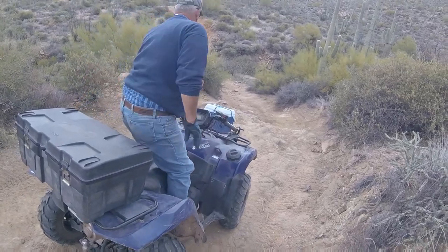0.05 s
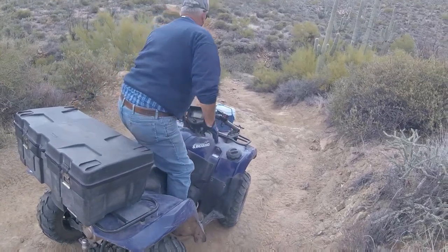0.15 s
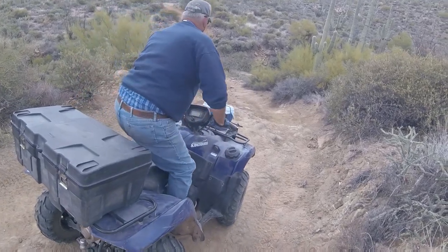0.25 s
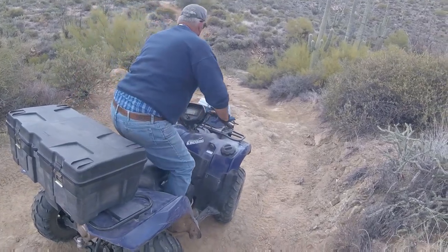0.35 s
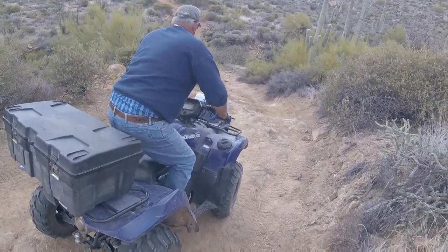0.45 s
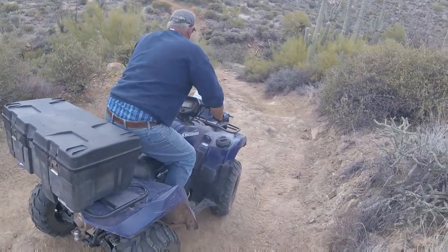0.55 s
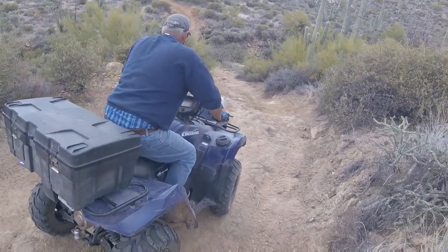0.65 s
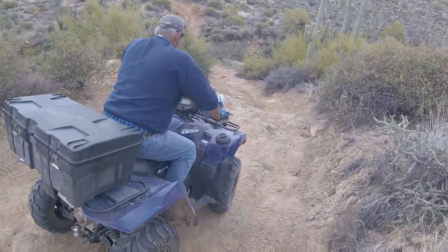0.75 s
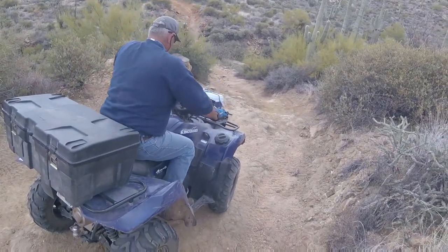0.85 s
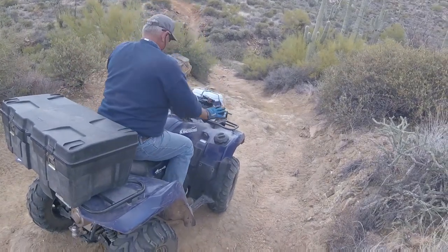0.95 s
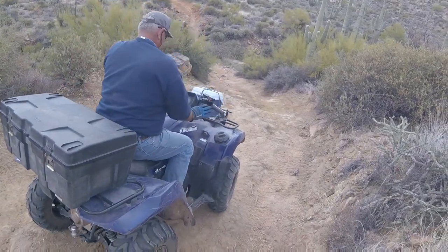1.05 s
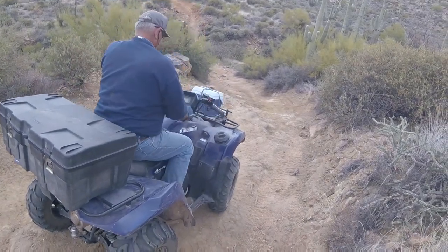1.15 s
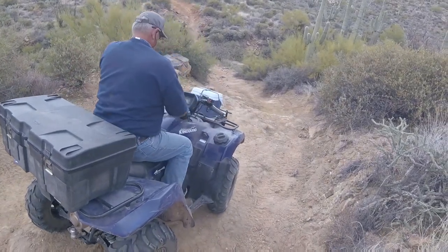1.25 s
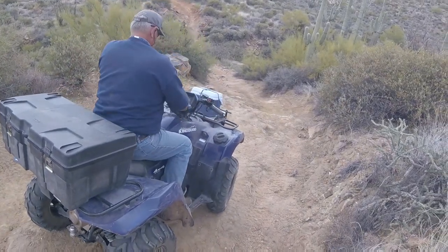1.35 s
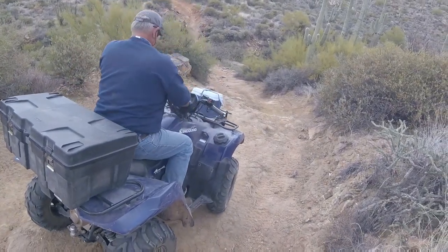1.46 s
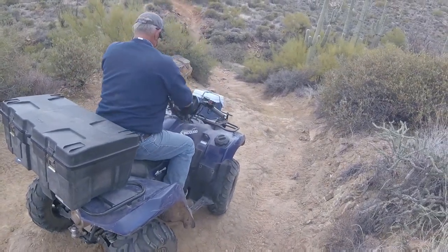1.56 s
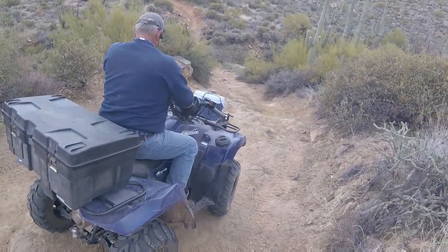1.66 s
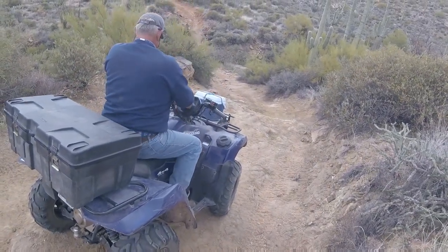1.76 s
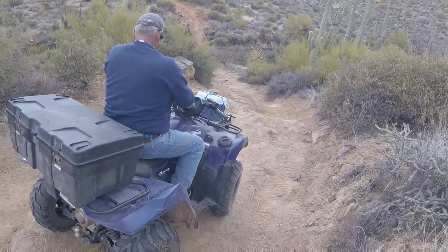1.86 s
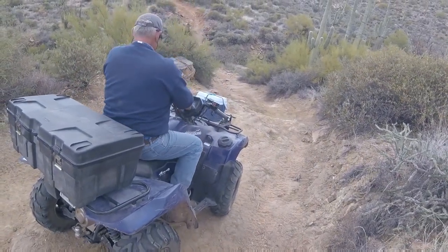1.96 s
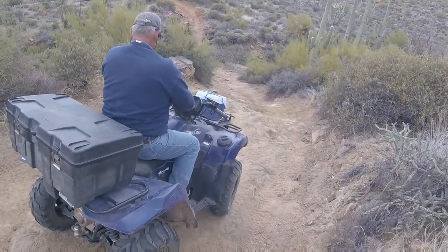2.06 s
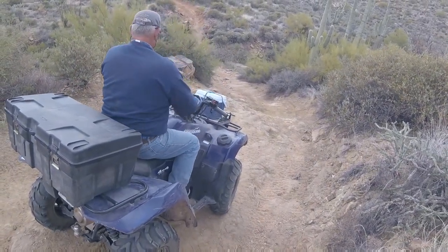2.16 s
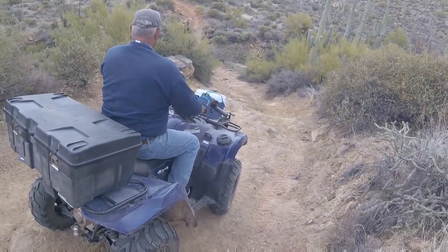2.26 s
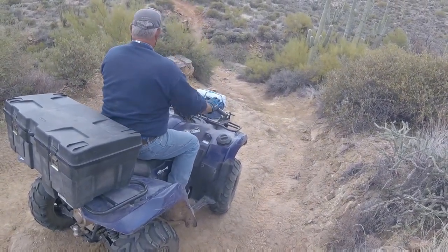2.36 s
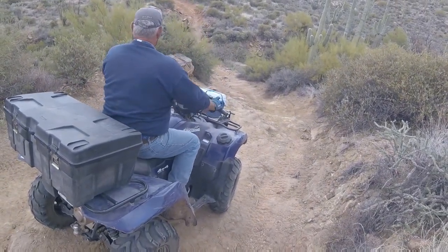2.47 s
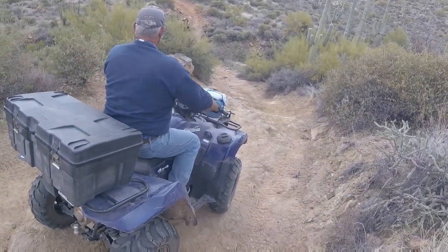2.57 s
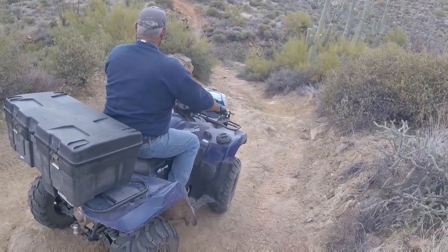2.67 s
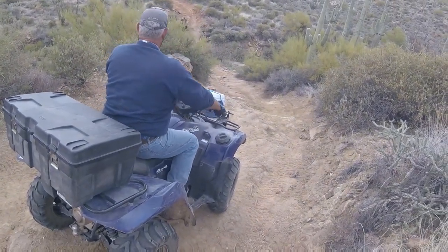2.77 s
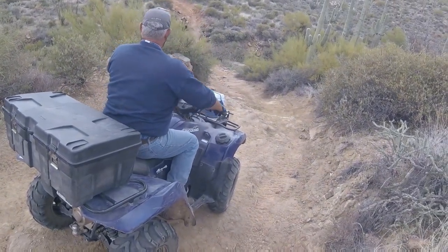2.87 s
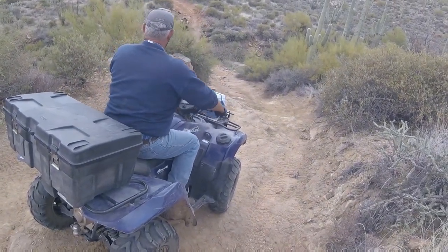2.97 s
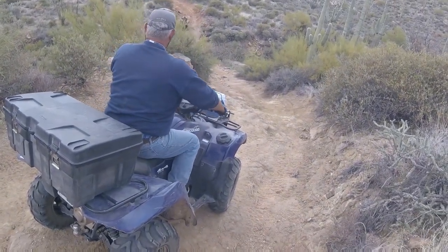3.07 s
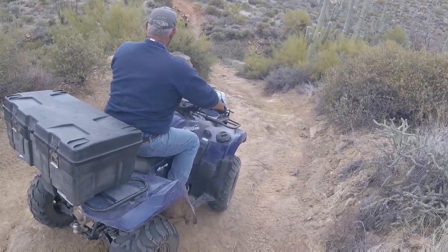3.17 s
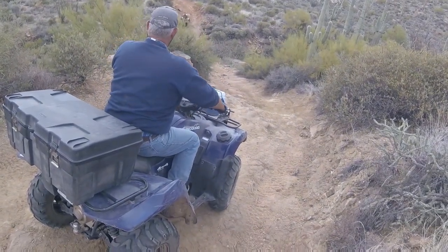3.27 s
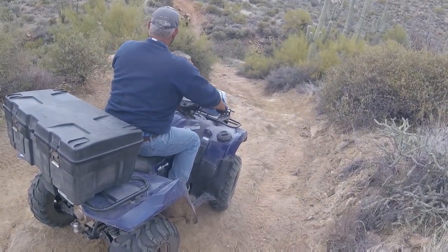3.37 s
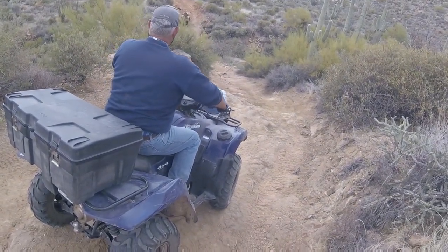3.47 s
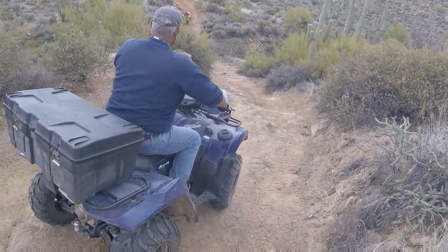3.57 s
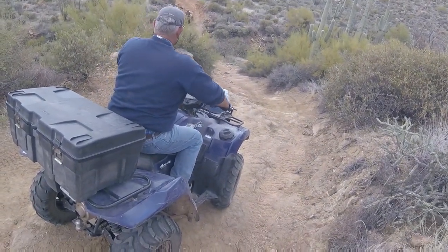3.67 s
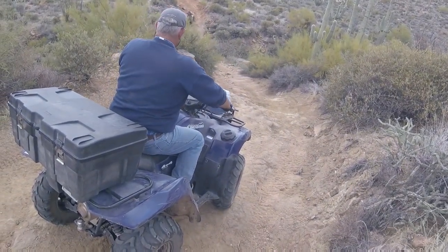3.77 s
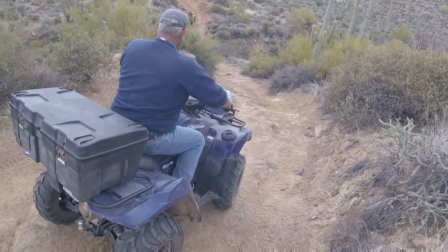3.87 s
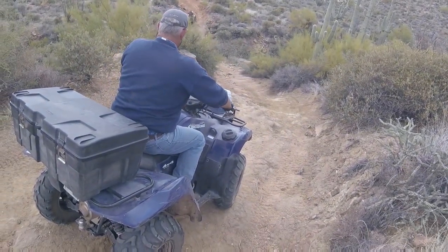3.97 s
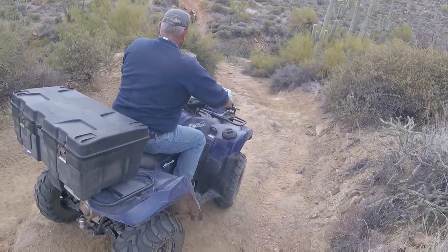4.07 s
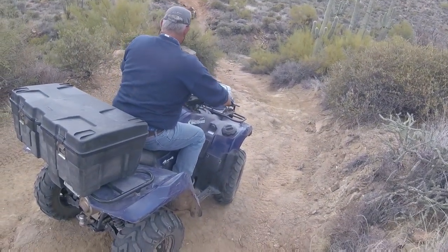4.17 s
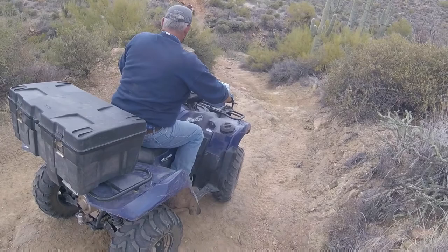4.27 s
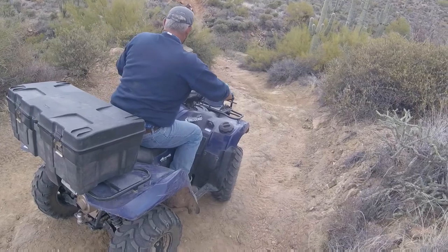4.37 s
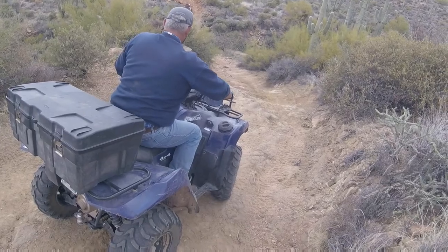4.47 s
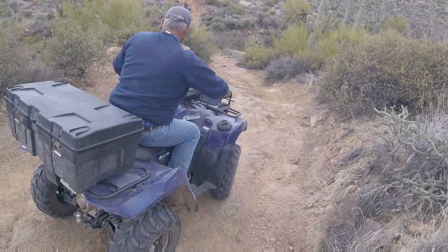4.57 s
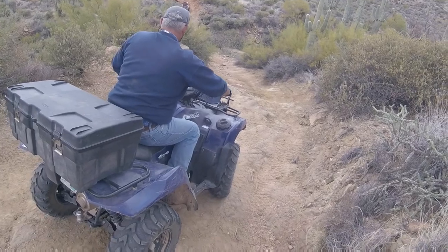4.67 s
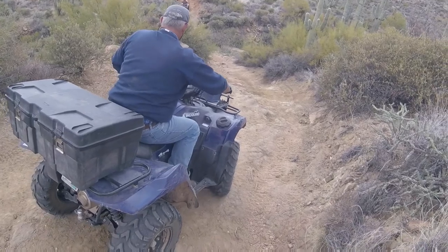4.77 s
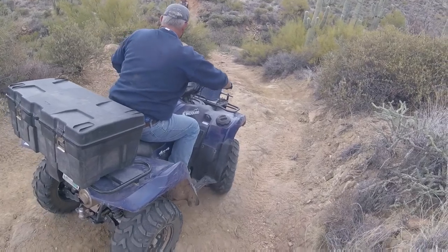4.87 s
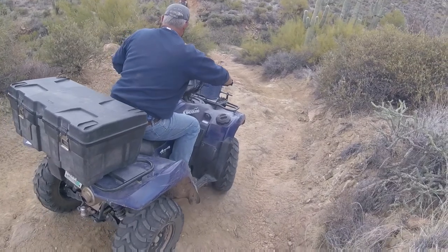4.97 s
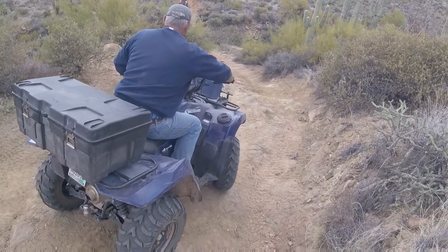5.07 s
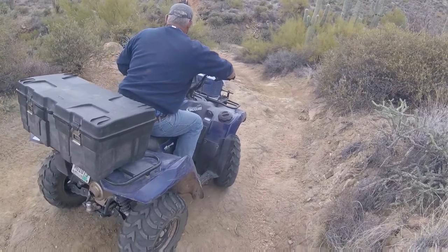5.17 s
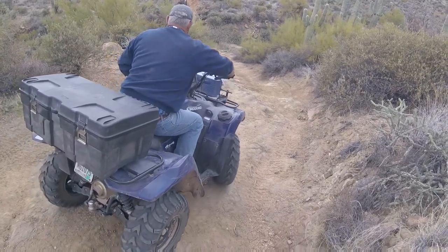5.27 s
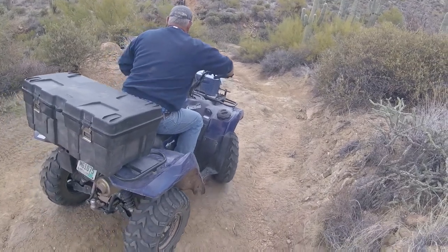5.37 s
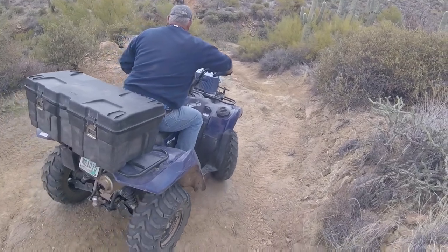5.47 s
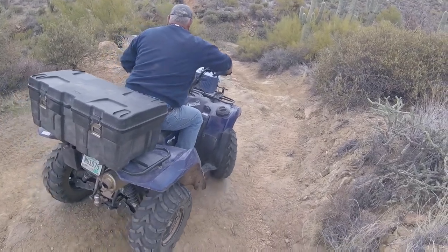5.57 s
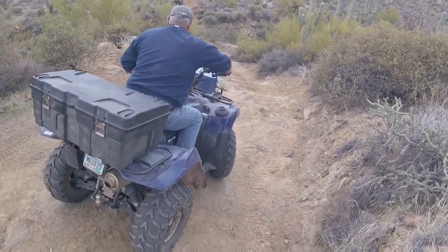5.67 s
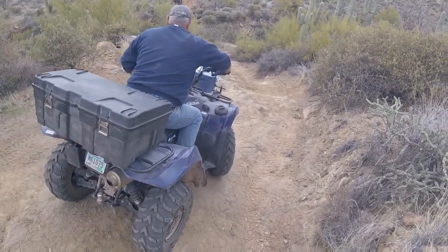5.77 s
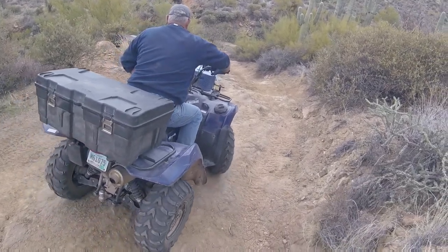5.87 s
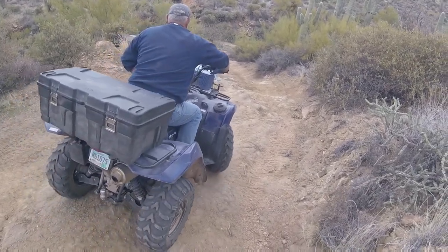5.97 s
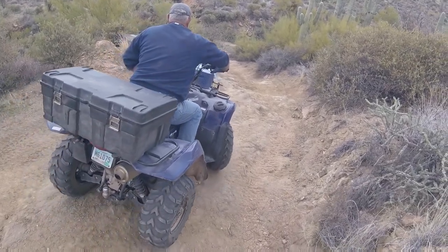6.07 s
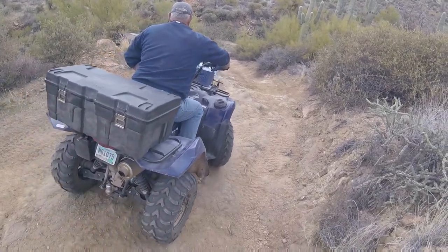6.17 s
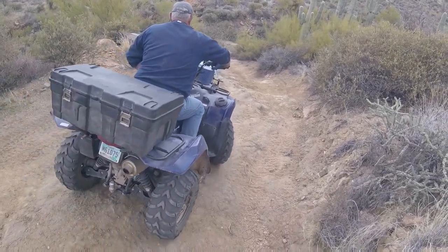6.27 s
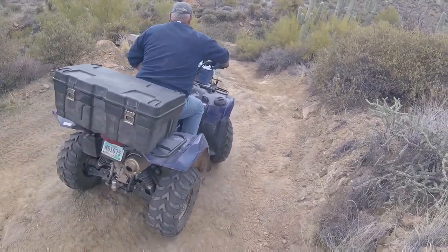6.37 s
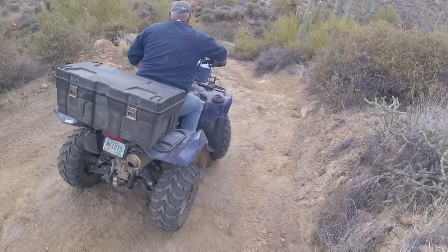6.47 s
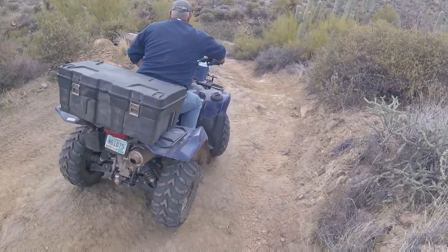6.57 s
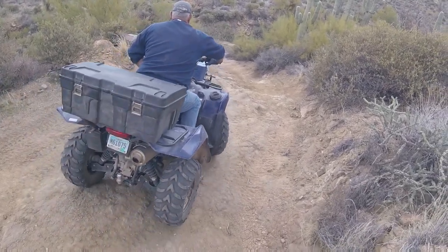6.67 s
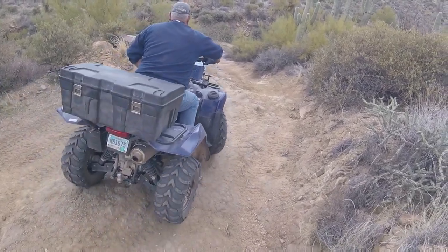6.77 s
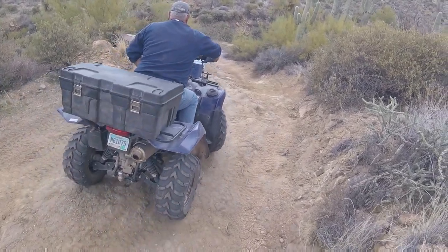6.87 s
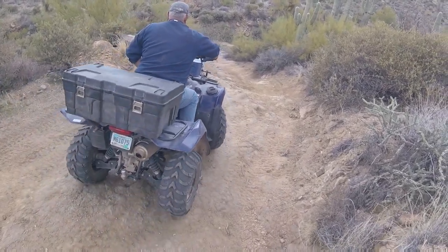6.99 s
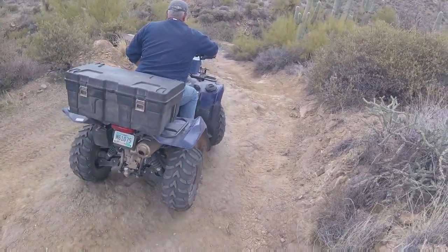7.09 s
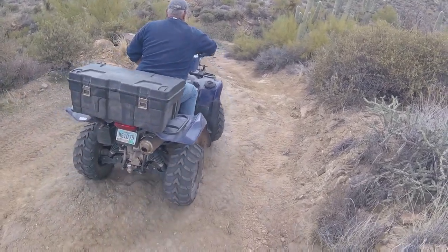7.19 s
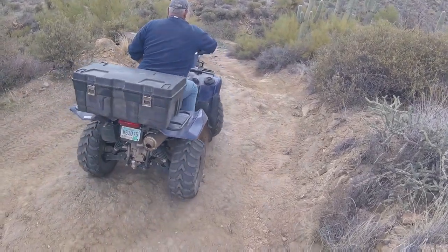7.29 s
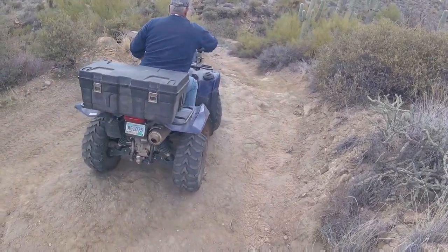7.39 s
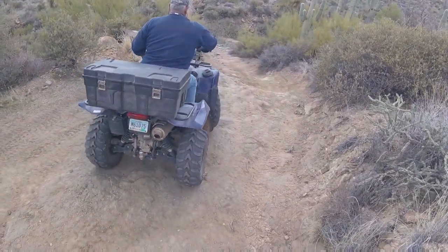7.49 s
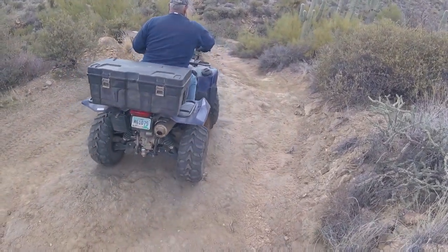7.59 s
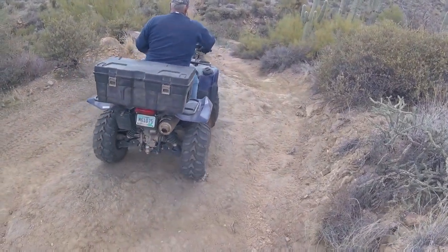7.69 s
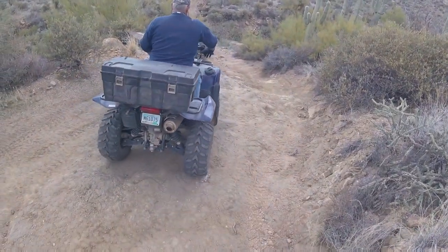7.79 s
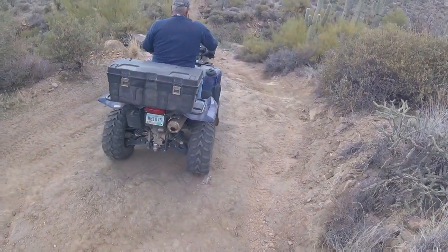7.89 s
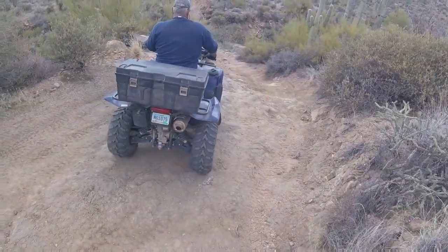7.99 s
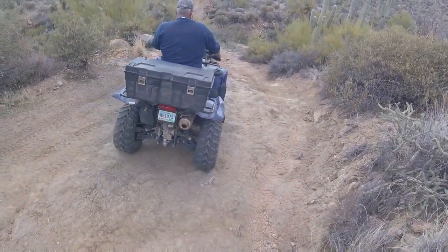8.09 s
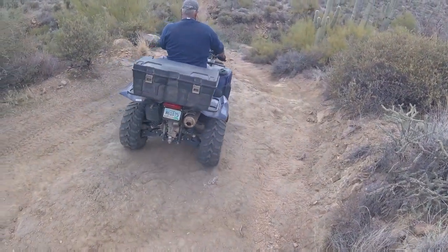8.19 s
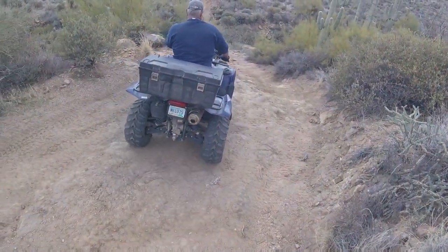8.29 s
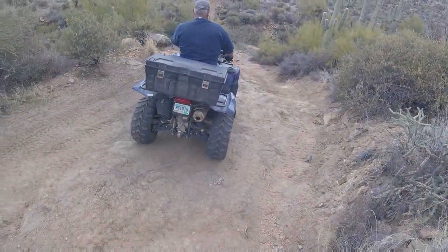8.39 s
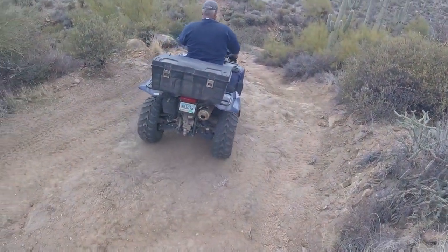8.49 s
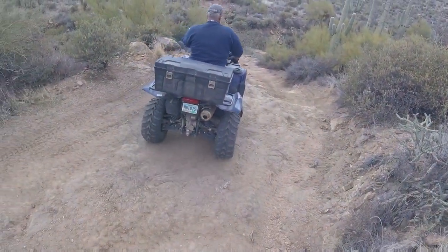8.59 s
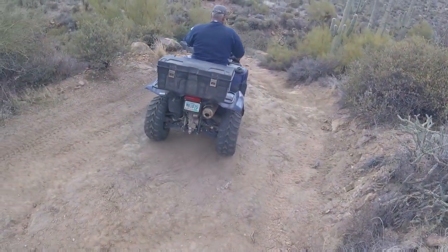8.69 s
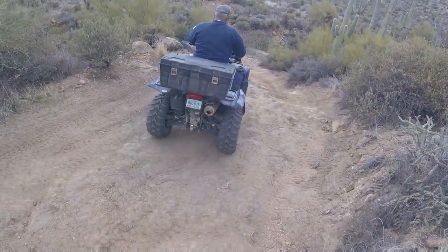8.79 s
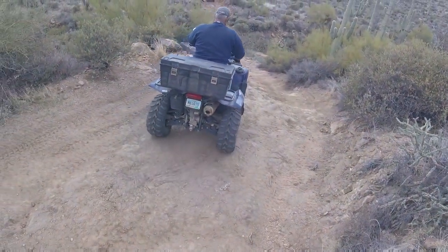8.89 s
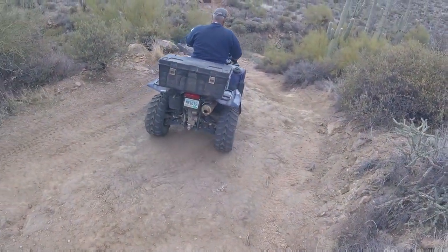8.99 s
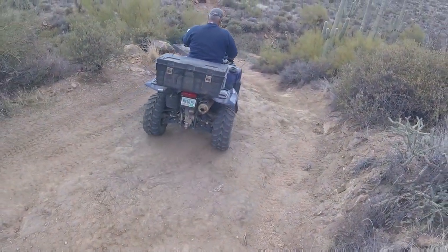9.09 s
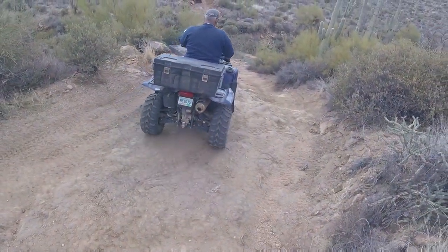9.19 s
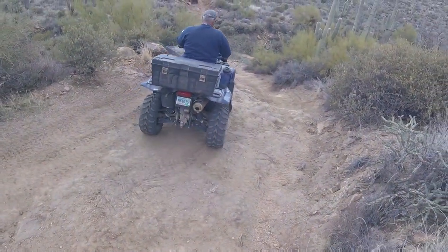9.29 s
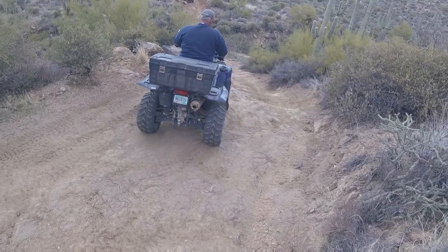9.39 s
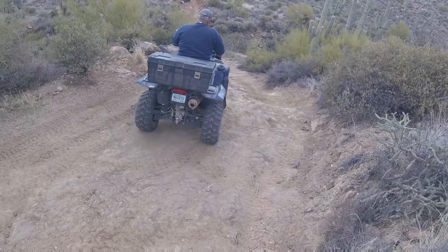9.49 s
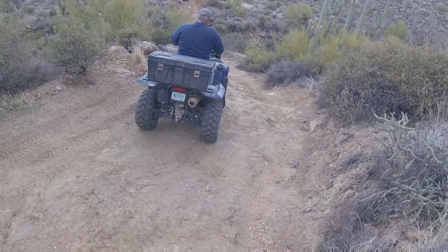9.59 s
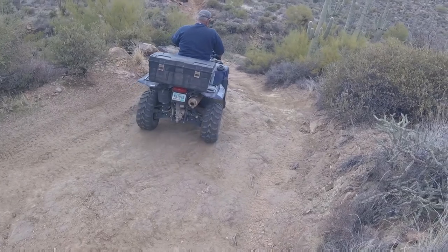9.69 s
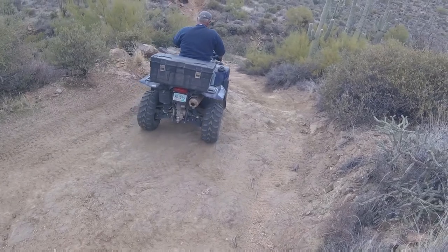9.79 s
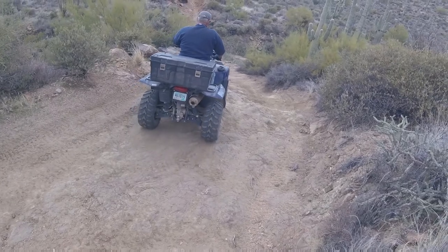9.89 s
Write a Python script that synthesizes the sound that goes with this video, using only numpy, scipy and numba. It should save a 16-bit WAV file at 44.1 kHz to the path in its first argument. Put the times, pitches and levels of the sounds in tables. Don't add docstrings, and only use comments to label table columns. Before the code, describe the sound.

Uneven idling and low wind, then a brief starter whine and grind; a quad engine fires, chugs, surges louder and drops to slow thumping.

```python
import sys
import numpy as np
from scipy import signal
from scipy.fft import rfft, irfft
from scipy.io import wavfile
from scipy.ndimage import uniform_filter1d
from numba import njit

SR = 44100
rng = np.random.default_rng(int(sys.argv[2]) if len(sys.argv) > 2 else 0)


def convert_level_to_amplitude(level_db):
    exponent = np.asarray(level_db, float) / 20
    return 10 ** exponent


def int16_out(signal):
    q = np.round(np.clip(np.atleast_2d(signal).T, -1, 1) * 32767)
    wavfile.write(sys.argv[1], SR, q.astype(np.int16))


N = 438354
TIME = np.arange(N) / SR


def unit(x):
    return x / np.sqrt(np.mean(x ** 2))


def curves(table):
    s, *columns = np.transpose(table)
    return [np.interp(TIME, s, c) for c in columns]


def white():
    return rng.standard_normal(N)


def colour(x, spectrum):
    hz, db = np.transpose(spectrum)
    bins_hz = np.maximum(np.arange(N // 2 + 1) * SR / N, 1)
    gain_db = np.interp(np.log(bins_hz), np.log(hz), db, left=-120, right=-120)
    return irfft(rfft(x) * convert_level_to_amplitude(gain_db), N)


def noise(spectrum):
    return unit(colour(white(), spectrum))


def walk(rate_hz):
    k = int(SR / rate_hz)
    held = np.repeat(white()[:N // k + 1], k)
    return unit(uniform_filter1d(uniform_filter1d(held, k), k)[:N])


@njit
def ring(x, hz, t60_s):
    y, z, r = np.empty(len(x)), 0j, np.exp(-np.log(1000) / (t60_s * SR))
    for i in range(len(x)):
        z = z * r * np.exp(2j * np.pi * hz[i] / SR) + x[i]
        y[i] = z.imag
    return y


def body_mode(x, hz, width_hz):
    return ring(x, np.full(N, 1. * hz), np.log(1000) / (np.pi * width_hz))


def resonate(x, peaks):
    return sum(convert_level_to_amplitude(db) * unit(body_mode(x, hz, width_hz)) for hz, width_hz, db in peaks)


def firings(times, scatter_db, push_s):
    times = times[times < TIME[-1]]
    size = convert_level_to_amplitude(scatter_db * rng.standard_normal(300)[:len(times)])
    pulses = np.zeros(N)
    pulses[(times * SR).astype(int)] = size
    push = np.hanning(int(push_s * SR))
    k = np.clip(np.searchsorted(times, TIME) - 1, 0, len(times) - 2)
    since = np.maximum(TIME - times[k], 0)
    return np.convolve(pulses + 1e-18, push)[:N], since, np.diff(times)[k], size[k]


def pipe(pulses, modes, speed):
    stretch = speed ** 0.2
    cold, hot = np.zeros(N), np.zeros(N)
    for hz, t60_s, db, sign, gain_db in modes:
        mode = sign * ring(pulses, hz * stretch, 1. * t60_s)
        cold += convert_level_to_amplitude(db) * mode
        hot += convert_level_to_amplitude(db + gain_db * np.log2(speed)) * mode
    return hot / np.sqrt(np.mean(cold ** 2))


def puff(since, lag_s, decay_s):
    age = since - lag_s
    attack = np.clip(age / .003, 0, 1)
    return np.where(age > 0, np.exp(-np.maximum(age, 0) / decay_s) * attack, 0)


def quad():
    # time in seconds, firings per second.
    speed_rows = [(3.159, 11.61), (3.33, 11.59), (3.37, 9.7), (3.79, 11.87), (4.59, 12.54), (4.86, 11.82),
                  (5.45, 14.33), (5.5, 11.93), (5.55, 13.82), (6.36, 19.56), (6.61, 14.95), (6.94, 19.34),
                  (7.29, 20.12), (7.55, 13.21), (7.9, 10.98), (7.97, 10.0), (8.01, 10.9), (9.95, 10.99)]
    # time in seconds, dB over the fast idle.
    effort_rows = [(3.17, 5.5), (3.3, 0), (3.8, -1), (4.55, -0.5), (4.9, -1.5), (5.4, 2), (5.75, 2),
                   (6.3, 2.5), (6.5, -5), (6.8, 4), (7.3, 0.5), (7.47, 2.5), (7.72, -2.5), (8.1, -4),
                   (9.4, -5), (9.94, -2.5)]
    effort_db = curves(effort_rows)[0]
    shut = np.clip((TIME - 7.34) / .08, 0, 1)
    clatter_db = -51.5 + 0.34 * effort_db - 4 * shut
    gas_db = -60.5 + 1.16 * effort_db - 0.38 * shut

    turned = np.cumsum(curves(speed_rows)[0] * (TIME >= speed_rows[0][0])) / SR
    times = TIME[np.searchsorted(turned, np.arange(int(turned[-1]) + 1), side="right")] - .002
    pulses, since, cycle, size = firings(times, scatter_db=1.4, push_s=0.0019)
    speed = uniform_filter1d(1 / cycle, SR // 10) / 13.17

    spit = 1.17 * size * speed ** 0.96 * puff(since, 0.0017, 0.0086)
    spit += 1.1 * puff(since, 0.19 * cycle, 0.0073)
    spit += .25 * puff(since, cycle - .013, 0.01)

    case = crankcase(since, cycle, spit, clatter_db, gas_db)
    jet = convert_level_to_amplitude(gas_db + 0.57) * gas_jet(spit)
    running = TIME > times[0]
    return exhaust(pulses, spit, speed, effort_db, shut, clatter_db) + running * (case + jet) + gears(since / cycle)


def exhaust(pulses, spit, speed, effort_db, shut, clatter_db):
    # pitch in Hz, t60 in seconds, level in dB, sign, dB gained per doubling of speed.
    thump_modes = [(37.2, 0.63, -34, 0.66, 3), (50.7, 0.085, 6.5, -0.64, -18.5), (87.4, 0.16, 5, 1, 2.5),
                   (120, 0.16, -20, -0.43, -1)]
    bark_modes = [(193.2, 0.08, 2, 1, 5), (230.4, 0.071, 2.5, -0.97, 1.5), (266, 0.19, -5, 0.49, -5.5),
                  (368.2, 0.15, -9.5, -0.51, 2)]
    pop_modes = [(602.3, 0.1, 2.5, 0.66, 11), (693, 0.079, -7.5, -1.88, 4.8), (499, 0.064, -8, -0.93, 3.3)]
    misfire_db = -9 * np.exp(-((TIME - 7.59) / 0.024) ** 2)
    thump_db = -34 + 0.43 * effort_db + 0.1 * shut + misfire_db
    bark_db = -41.5 + 0.43 * effort_db - 10 * shut
    echoed = pulses + 0.36 * np.interp(TIME - 0.01194 / speed ** 0.16, TIME, pulses)
    rough = pulses + .012 * spit * white()
    pop_lag_s = 0.00608 + 0.00599 * shut
    late = np.interp(TIME - pop_lag_s, TIME, rough)
    out = convert_level_to_amplitude(thump_db) * pipe(echoed, thump_modes, speed)
    out += convert_level_to_amplitude(bark_db) * pipe(echoed, bark_modes, speed)
    out += convert_level_to_amplitude(clatter_db - 10 + 2.7 * shut) * pipe(late, pop_modes, speed)
    return out * speed ** -.5


def crankcase(since, cycle, spit, clatter_db, gas_db):
    # frequency in Hz, level in dB per Hz.
    case_spectrum = [(180, -16), (300, 1), (330, -10.5), (437, -10), (622, -10.5), (751, -12), (826, -9),
                     (1320, -13.5), (1470, -9.5), (1970, -16.5), (2710, -22.5), (3730, -23), (5000, -27),
                     (6500, -44.5), (11000, -120)]
    # pitch in Hz, width in Hz, level in dB.
    case_rings = [(646, 72, -12), (1420, 68, -15.5), (950, 900, -20), (2720, 350, -10)]
    knocks = white() * convert_level_to_amplitude(4.0 * walk(250))
    beat = (1.0 + 1.6 * puff(since, 0.29 * cycle, 0.0037)) * convert_level_to_amplitude(0.92 * walk(40))
    clatter = unit(beat) * (noise(case_spectrum) + resonate(knocks, case_rings))
    blast = unit(spit) * noise(case_spectrum)
    return convert_level_to_amplitude(clatter_db - 3.0) * clatter + convert_level_to_amplitude(gas_db + 2.5) * blast


def gas_jet(spit):
    # frequency in Hz, level in dB per Hz.
    gas_spectrum = [(1400, -30), (2500, -0.5), (3300, -1.5), (3800, -7), (4900, -1), (5700, 1),
                    (6100, -2.5), (6500, 1), (6950, -4.5), (7400, -5.5), (8200, -2.5), (10300, -2),
                    (15000, -11)]
    rush = unit((.16 + spit) * convert_level_to_amplitude(1.7 * walk(55))) * noise(gas_spectrum)
    whistle_hz = 5900 * convert_level_to_amplitude(0.9 * walk(16))
    return rush + convert_level_to_amplitude(-9.5) * unit(ring(spit * white(), whistle_hz, 0.016))


def gears(phase):
    # time in seconds, pitch in Hz, level in dB.
    gear_rows = [(3.2, 2030, -61.5), (5.3, 2100, -63.5), (5.8, 2010, -89.5), (7.6, 1865, -77.5),
                 (8.1, 1798, -62.5), (9.94, 1855, -68)]
    whine_hz, whine_db = curves(gear_rows)
    lurch = np.cos(2 * np.pi * (phase - .25))
    swayed_hz = whine_hz * (1 + .03 * np.sin(2 * np.pi * (.25 - phase)))
    whine = convert_level_to_amplitude(whine_db - 4.0 + 4.0 * lurch) * unit(ring(white(), swayed_hz, 0.05))
    return (TIME > gear_rows[0][0]) * whine


def starter():
    # start in seconds, length in seconds, level in dB, whine from Hz, whine to Hz.
    strokes = [(2.599, 0.031, -61, 1910, 1970), (2.626, 0.068, -49, 1805, 2070),
               (2.703, 0.062, -58.5, 1565, 1607), (2.76, 0.018, -52, 2630, 2780),
               (2.773, 0.059, -44.5, 3180, 2352), (2.845, 0.061, -63.5, 1960, 1840),
               (2.988, 0.02, -44.5, 1555, 1370), (3.01, 0.025, -58.5, 2620, 2570),
               (3.091, 0.042, -41.5, 2730, 2465)]
    # frequency in Hz, level in dB per Hz.
    grind_spectrum = [(250, -37), (430, -29), (680, 0), (950, -6.5), (1450, -5), (2000, -5), (2600, -5),
                      (3500, -13), (4100, -12), (5000, -11), (6000, -9), (7000, -19), (15000, -13.5)]
    # pitch in Hz, width in Hz, level in dB.
    housing_modes = [(760, 72, -1), (1416, 40, 8.5), (3860, 64, -22), (5740, 100, -0.5), (6600, 30, -13),
                     (6520, 140, 0.5)]
    effort, whine_hz = np.zeros(N), np.full(N, 2000.)
    for s, length_s, db, from_hz, to_hz in strokes:
        age = TIME - s
        attack = np.clip(age / (6.3 * length_s ** 2), 0, 1)
        effort += convert_level_to_amplitude(db) * attack * np.exp(-np.maximum(age - length_s, 0) / 0.012)
        slide_hz = from_hz + (to_hz - from_hz) * np.clip(age / length_s, 0, 1)
        whine_hz = np.where(age > 0, slide_hz, whine_hz)
    effort *= convert_level_to_amplitude(2.6 * walk(120))
    hum = convert_level_to_amplitude(-60.5) * (TIME > strokes[0][0]) * (TIME < strokes[-1][0] + .05)
    teeth = white() * convert_level_to_amplitude(4.0 * walk(900))
    partials = [(.42, -10.5), (.68, -14), (1, -5), (1.55, -11.5), (2.1, -9)]  # (share of whine pitch, dB)
    whine = sum(convert_level_to_amplitude(db) * unit(ring(teeth, share * whine_hz, 0.13)) for share, db in partials)
    housing = np.zeros(N)
    for hz, width_hz, db in housing_modes:
        answer = convert_level_to_amplitude(db - 14.5 + 5.9 * walk(20))
        housing += answer * np.sqrt(width_hz / SR * 12) * body_mode(effort * teeth, hz, width_hz)
    return convert_level_to_amplitude(-0.5) * (effort + hum) * noise(grind_spectrum) + effort * whine + housing + pinion_clunk()


def pinion_clunk():
    age = np.maximum(TIME - 2.535, 0)
    return convert_level_to_amplitude(-23.5) * age / .02 * np.exp(1 - age / 0.015) * np.sin(2 * np.pi * 62 * age)


def idler():
    # time in seconds, level in dB.
    idle_rows = [(0, -39), (.7, -40.5), (2.5, -42), (3.2, -42), (5.2, -47), (7.5, -54), (8.8, -41.5),
                 (9.94, -45.5)]
    # pitch in Hz, t60 in seconds, level in dB, sign, dB gained per doubling of speed.
    idle_modes = [(48, .14, -2, -0.97, 0), (104, 0.32, 2, 0.83, 0), (136.6, 0.09, -4.5, 0.22, 0),
                  (233.5, 0.11, -16.5, 0.76, 0), (292, 0.09, -18, -1.4, 0)]
    # time in seconds, level in dB.
    fan_rows = [(0, -71.5), (1.6, -69), (2.7, -69.5), (9.94, -86.5)]
    shroud = [(525, 66, 1.0), (625, 80, -2.5), (699, 15, -4.5), (887, 40, -9),
              (1925, 220, -3.5), (6520, 300, -9.5)]
    times = .039 + .0954 * np.arange(110) + 0.00278 * rng.standard_normal(110)
    pulses = firings(times, scatter_db=1.5, push_s=0.0024)[0]
    fan = convert_level_to_amplitude(curves(fan_rows)[0] + 2.0 * walk(20)) * resonate(white(), shroud)
    return convert_level_to_amplitude(curves(idle_rows)[0]) * pipe(pulses, idle_modes, np.ones(N)) + fan


def luggage():
    # centre in seconds, length in seconds, level in dB.
    rattles = [(4.616, 0.081, -59), (6.218, 0.22, -62), (7.096, 0.22, -58), (8.445, .07, -64),
               (8.72, 0.15, -65), (9.015, .1, -70.5)]
    # pitch in Hz, width in Hz, level in dB.
    box_modes = [(930, 120, -9), (1467, 110, 2), (1650, 170, -2), (2050, 160, -14.5)]
    shake = sum(convert_level_to_amplitude(db) * np.exp(-((TIME - s) / length_s) ** 2) for s, length_s, db in rattles)
    taps = puff(TIME % .044, 0.0007, 0.0052) * convert_level_to_amplitude(3.0 * walk(23))
    return shake * resonate(taps * white(), box_modes)


def squeaks():
    # start in seconds, length in seconds, from Hz, to Hz, level in dB.
    squeals = [(3.769, 0.12, 3450, 3190, -58.5), (6.01, 0.032, 6980, 7310, -53),
               (6.801, 0.1, 7540, 7200, -57), (7.202, 0.064, 8100, 7190, -60.5)]
    out = np.zeros(N)
    for s, length_s, from_hz, to_hz, db in squeals:
        done = np.clip((TIME - s) / length_s, 0, 1)
        squeal = unit(ring(white(), from_hz + (to_hz - from_hz) * done, .12))
        out += convert_level_to_amplitude(db) * np.sin(np.pi * done) * squeal
    return out


def insect():
    # time in seconds, level in dB.
    rasp_rows = [(.9, -84.5), (1.3, -82), (1.6, -78), (1.85, -75), (2.05, -78.5), (2.25, -87)]
    wing = [(4830, 780, -2.0), (5480, 920, -4), (3630, 2100, 1.0), (7040, 760, -4.5)]  # (Hz, width Hz, dB)
    strokes = unit(puff((TIME - 1.572) % .0388, 0.00081, 0.025) * convert_level_to_amplitude(1.5 * walk(25.88)))
    return convert_level_to_amplitude(curves(rasp_rows)[0]) * strokes * resonate(white(), wing) * (TIME < rasp_rows[-1][0])


def wind():
    # time in seconds, rumble in dB.
    breeze = [(0, -43.5), (.5, -45), (1.4, -39.5), (2.3, -46.5), (2.8, -37), (4.9, -40.5), (5.7, -41.5),
              (6.7, -43), (7.5, -38), (8.4, -39.5), (8.9, -42.5), (9.94, -42)]
    # centre in seconds, length in seconds, rumble in dB, flutter in dB relative to rumble.
    gusts = [(0.518, 0.077, -45, -2), (1.869, 0.49, -45, -18), (2.57, 0.086, -33, -11.5),
             (4.254, 0.064, -44, -4.5), (4.554, 0.14, -40.5, -4.5), (5.041, 0.14, -38, -36),
             (5.25, 0.057, -50, -6), (6.264, 0.065, -49.5, 0.5), (6.838, .1, -44, -6),
             (7.338, 0.19, -41, -10.5), (8.569, 0.13, -29.5, -10), (8.703, 0.057, -35, 0.5),
             (9.226, .03, -43, -1), (9.281, 0.082, -34.5, -6), (9.372, 0.039, -35.5, -2)]
    rumble_gain = convert_level_to_amplitude(curves(breeze)[0])
    flutter_gain = convert_level_to_amplitude(-12) * rumble_gain
    for s, length_s, db, flutter_db in gusts:
        side_s = length_s * np.where(TIME < s, 0.39, 1)
        swell = np.exp(-((TIME - s) / side_s) ** 2)
        rumble_gain = rumble_gain + convert_level_to_amplitude(db) * swell
        flutter_gain = flutter_gain + convert_level_to_amplitude(db + flutter_db) * swell
    rumble = convert_level_to_amplitude(2.46 * walk(14)) * noise([(10, -3.5), (25, -4.5), (60, -3.0), (110, -12.5), (150, -14.5)])
    flutter = convert_level_to_amplitude(3.1 * walk(45)) * noise([(60, -9.0), (110, 5.5), (160, -0.5), (280, -12), (500, -29)])
    return convert_level_to_amplitude(1.5) * rumble_gain * rumble + flutter_gain * flutter


def hillside():
    # frequency in Hz, level in dB per Hz.
    air_spectrum = [(200, -9), (330, -6), (430, -9), (700, -17.5), (940, -6.5), (1400, -13.5), (1950, -17),
                    (3400, -24.5), (4600, -27), (5800, -25), (6500, -29.5), (7300, -25), (10000, -19.5),
                    (15000, -6.5)]
    return convert_level_to_amplitude(-59 + .7 * walk(22)) * noise(air_spectrum)


def scene():
    machines = quad() + starter() + idler() + luggage() + squeaks()
    return (machines + insect() + wind() + hillside())[None]


def low_pass(x):
    return signal.sosfilt(signal.butter(12, 14300, fs=SR, output="sos"), x)


def record(dry):
    # frequency in Hz, gain in dB.
    microphone = [(10, 0), (6500, 0), (7500, -4), (9500, -14), (11000, -24), (12500, -32), (14300, -48),
                  (22050, -70)]
    # frequency in Hz, level in dB per Hz.
    hiss_spectrum = [(9000, -10), (11000, -3), (12500, 2.5), (14300, -5.5)]
    heard = colour(dry, microphone)
    treble = np.sqrt(uniform_filter1d(colour(heard, [(1000, 0), (9000, 0.002)]) ** 2, SR // 5))
    hiss = convert_level_to_amplitude(-87) * noise(hiss_spectrum) / (1 + (treble / convert_level_to_amplitude(-62)) ** 2)
    mix = .16 * np.tanh(heard / 0.15) + hiss
    return low_pass(mix)


dry = scene()
out = record(dry)
int16_out(out)
```